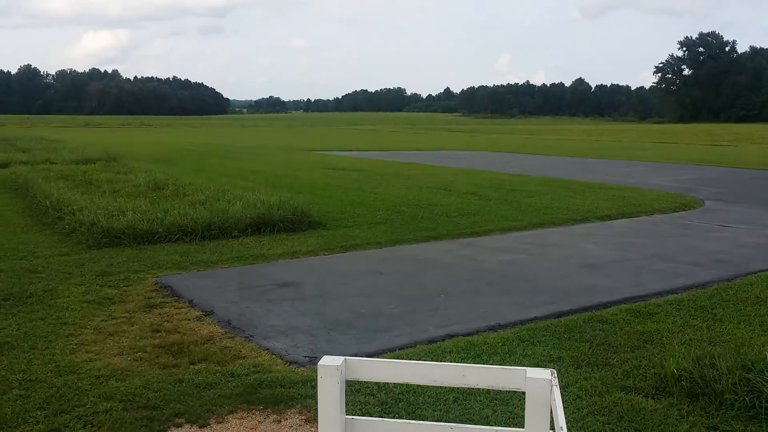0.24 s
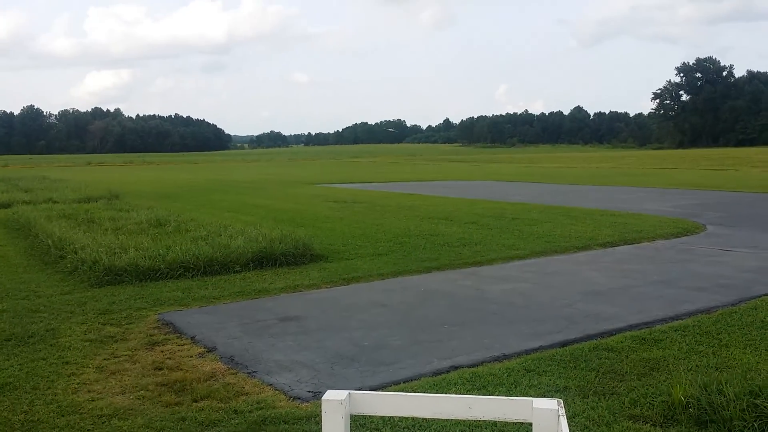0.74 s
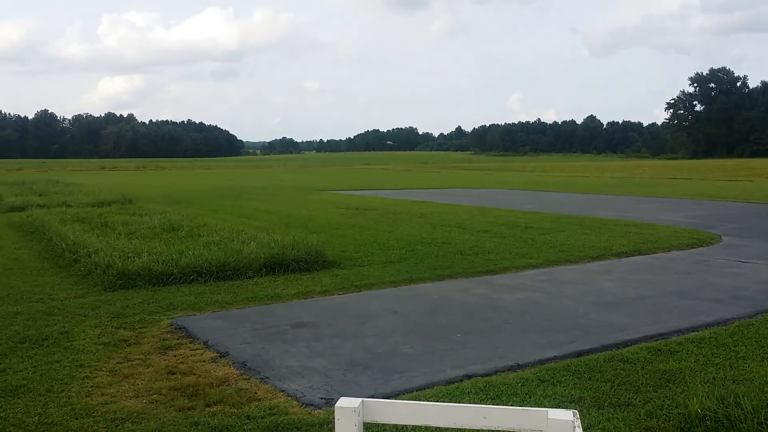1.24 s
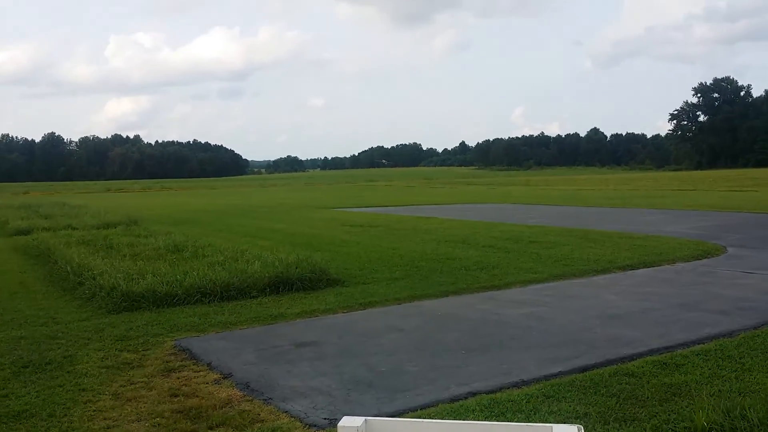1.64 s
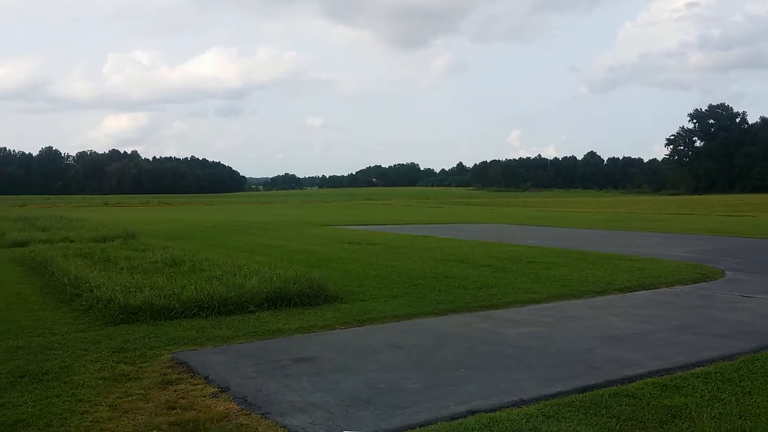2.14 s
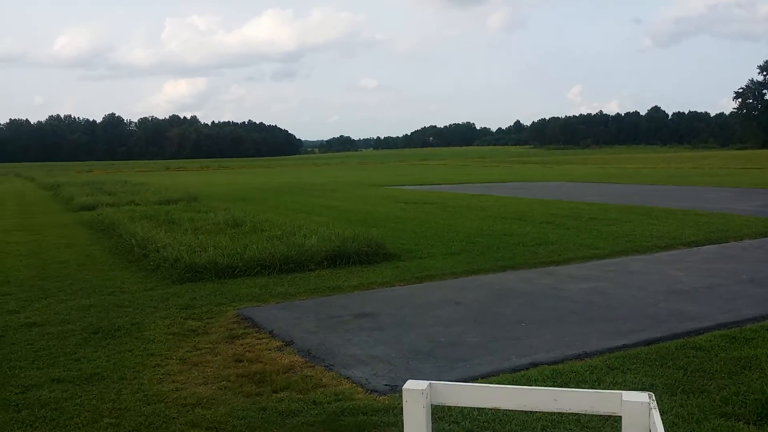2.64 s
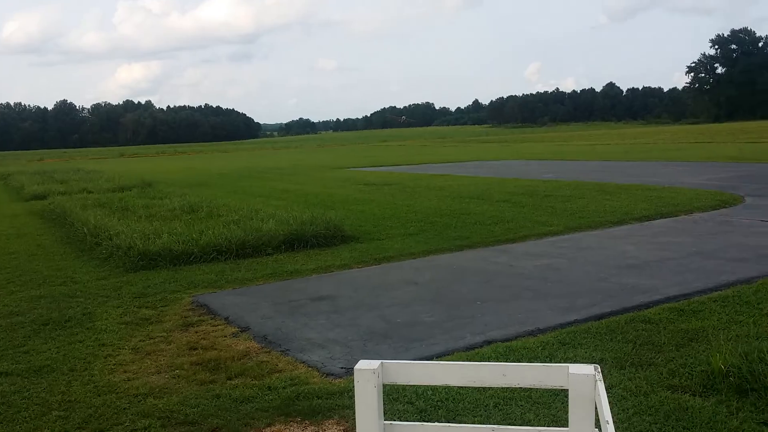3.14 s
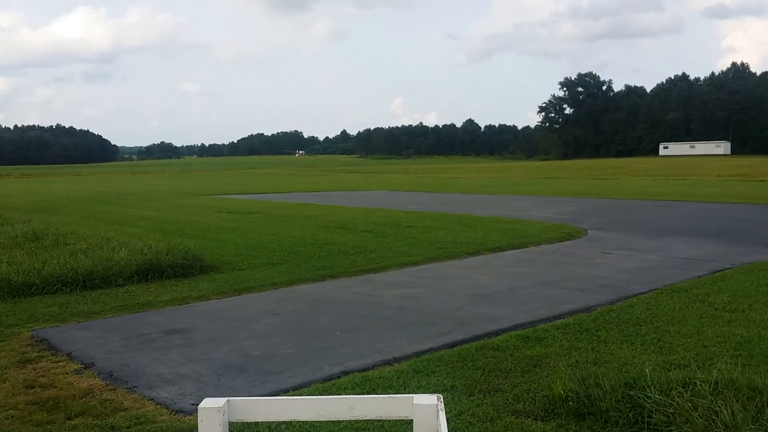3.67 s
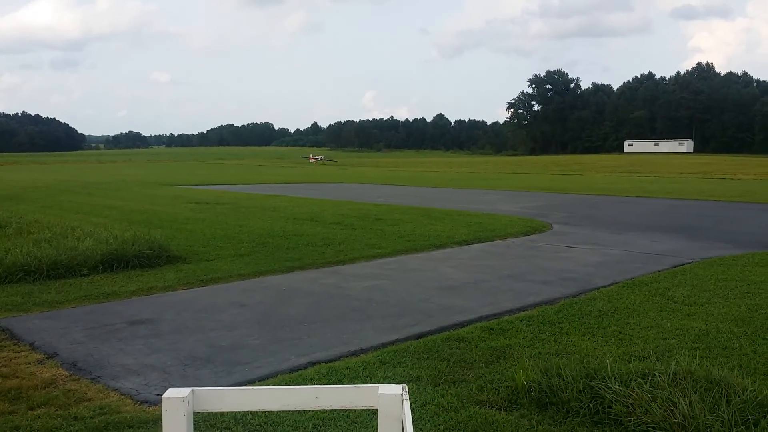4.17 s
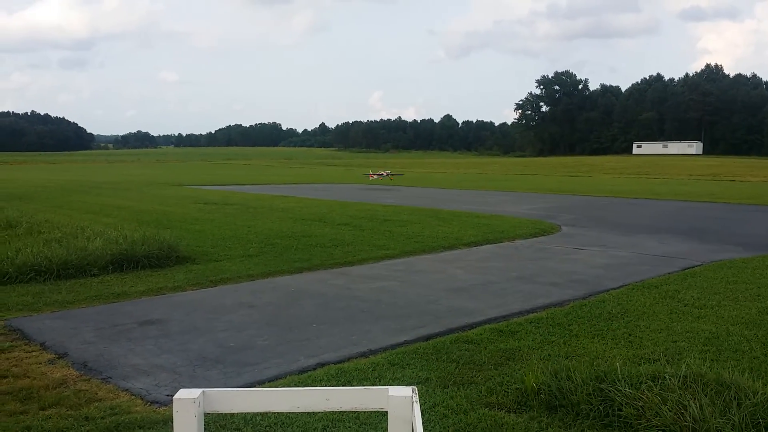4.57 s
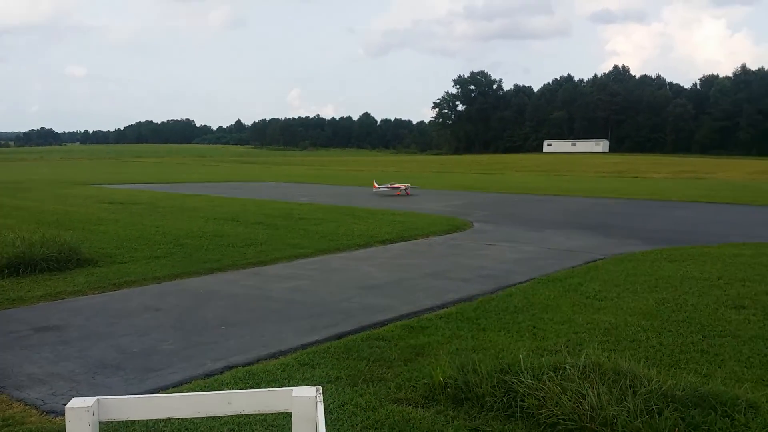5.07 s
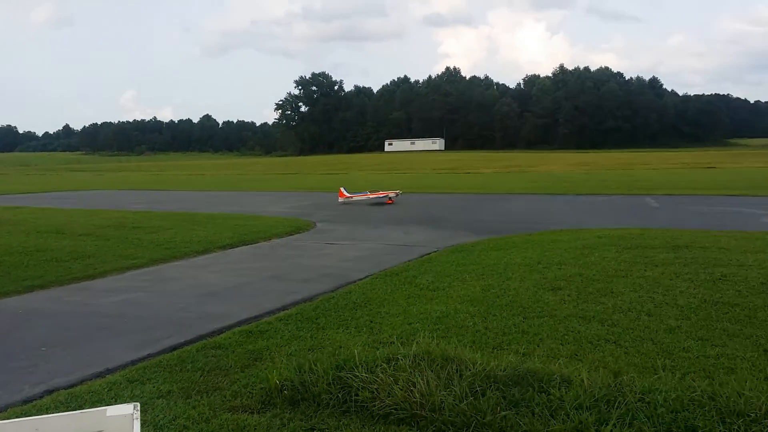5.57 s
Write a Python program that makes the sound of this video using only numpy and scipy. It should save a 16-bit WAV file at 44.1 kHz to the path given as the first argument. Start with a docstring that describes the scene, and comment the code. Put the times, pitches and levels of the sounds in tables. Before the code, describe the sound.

Outdoors among singing insects, a distant single-cylinder model aircraft engine blips its throttle, crackles closer, then slows as its wheels rumble along a runway.

```python
"""A small model plane glides in over a field with its single-cylinder engine near idle, blips the throttle
three times, lands and rolls past on the asphalt. Each firing is a filtered pulse (muffler thump, pipe putter)
with bursts of noise for rasp, propeller wash and crack; hard firings crack loudest.
Insects sing as a noise chorus and modulated sines over a faint rumble and hum. A short scuff (noise) and
dull thud (decaying sines) bump the microphone once; noise and ringing modes make the wheels."""
import sys
import numpy as np
from scipy import signal
from scipy.fft import rfft, irfft, next_fast_len
from scipy.io import wavfile

SR = 44100
rng = np.random.default_rng(int(sys.argv[2]) if len(sys.argv) > 2 else 0)


def master_out(mix):
    """Clip the mix to full scale and print it as 16-bit PCM to the path in sys.argv[1]."""
    frames = np.transpose(np.atleast_2d(mix))
    ceiling = np.clip(frames, -1, 1)
    pcm = np.round(ceiling * 32767).astype(np.int16)
    wavfile.write(sys.argv[1], SR, pcm)


N = 256220
T = np.arange(N) / SR


def amp(db):
    """Decibels to gain."""
    return 10 ** (np.asarray(db) / 20)


def unit(x):
    """Scales to rms 1."""
    return x / np.sqrt(np.mean(x ** 2) + 1e-20)


def read(points, hz):
    """Reads a spectrum on a log-frequency axis."""
    f, value = np.transpose(points)
    return np.interp(np.log(hz + 1), np.log(f + 1), value)


def follow(rows, t, outside=None):
    """Reads a curve at the times t."""
    s, value = np.transpose(rows)
    return np.interp(t, s, value, left=outside, right=outside)


def add(mix, start_s, sound):
    """Mixes a sound in at start_s."""
    part = mix[..., max(round(start_s * SR), 0):][..., :sound.shape[-1]]
    part += sound[..., :part.shape[-1]]


def filtered(x, kind, order, hz):
    """Butterworth filter."""
    return signal.sosfilt(signal.butter(order, hz, kind, fs=SR, output="sos"), x)


# plane's level at the left port against the right: freq_hz, left_minus_right_db
PORT_LEVEL = [(100, -3), (400, -4), (750, -3), (1300, 3.5), (2400, 5), (4400, 7), (6700, 7.5), (8200, -4.5),
              (14000, -2)]
# plane's phase between the ports: freq_hz, left_lead_rad
PORT_LEAD = [(0, 1), (700, -0.5), (1210, 1.5), (2240, -0.1), (5000, -0.2), (6700, 0.8), (7400, -4.5),
             (8600, -1.5), (16000, -3)]


def colour(x, tone, side=0.):
    """Stereo minimum-phase filter of unit energy; side scales the plane's level and phase between the ports."""
    size, lead = 8192, 32  # samples
    hz = np.fft.rfftfreq(size, 1 / SR)
    ports = side * np.array([[.5], [-.5]])
    db = read(tone, hz) + ports * read(PORT_LEVEL, hz)
    log_gain = np.log(amp(np.concatenate([db, db[:, -2:0:-1]], axis=1)))
    causal = np.exp(np.conj(signal.hilbert(log_gain)))[:, :len(hz)]
    shifted = causal * np.exp(1j * ports * read(PORT_LEAD, hz))
    taps = np.roll(irfft(shifted), lead, axis=1)[:, :size // 2]
    taps /= np.linalg.norm(taps.mean(axis=0))
    return signal.oaconvolve(np.broadcast_to(x, (2, N)), taps, axes=1)[:, lead:N + lead]


# likeness of turbulence at the two ports: freq_hz, correlation
PORT_CORRELATION = [(100, 0.97), (600, 0.93), (1500, 0.99), (3200, 0.66), (6800, 0.35), (12000, 1)]


def air():
    """White noise at both ports, correlated by frequency."""
    size = next_fast_len(N)
    a, b = rfft(rng.standard_normal((2, size)))
    same = np.clip(read(PORT_CORRELATION, np.fft.rfftfreq(size, 1 / SR)), -1, 1)
    return irfft(np.array([a, same * a + np.sqrt(1 - same ** 2) * b]), size)[:, :N]


def drift(per_s):
    """Slow random wander of rms 1."""
    spectrum = rfft(rng.standard_normal(N))
    return unit(irfft(spectrum * np.exp(-(np.fft.rfftfreq(N, 1 / SR) / per_s) ** 2), N))


def clicks(times, sizes):
    """A train of single impulses."""
    return np.bincount(np.clip(np.round(times * SR).astype(int), 0, N + 1), sizes, N + 2)[:N]


def puffs(train, decay_s):
    """Each impulse releases a decaying burst of turbulence; its energy does not depend on decay_s."""
    keep = np.exp(-2 / (decay_s * SR))
    return air() * np.sqrt(signal.lfilter([1 - keep], [1, -keep], train ** 2 + 1e-24))


def fizz(train, decay_s):
    """Fine turbulence: puffs without their bass, so the pulse below them stays clean."""
    return filtered(puffs(train, decay_s), "high", 2, 1500)


def rounded(train):
    """A pressure front loses its sharpest edge on its way over the grass."""
    return filtered(train, "low", 1, 3800)


def envelope(start_s, level_db, attack_s, fade_db_per_s):
    """A sound rises to its level, then fades."""
    t = T - start_s
    return np.clip(t / attack_s, 0, 1) * amp(level_db - fade_db_per_s * np.maximum(t - attack_s, 0))


# crankshaft speed: time_s, firings_per_s
CRANK_SPEED = [(0.0, 34.68), (0.175, 31.87), (0.629, 30.36), (0.883, 32.58), (1.185, 28.95), (1.538, 46.39),
               (1.781, 49.66), (2.086, 46.88), (2.334, 38.3), (2.612, 33.06), (3.211, 29.11), (3.56, 30.85),
               (3.812, 35.94), (4.226, 48.18), (4.576, 39.12), (4.82, 47.57), (5.315, 28.05),
               (5.451, 28.38), (5.706, 22.64), (5.81, 23.84)]
FULL_PULL = 37  # firings/s gained each second


def pick_up(times, over_s=0.19, lag_s=0.013):
    """How fast the engine gains or loses speed, in firings/s each second, limited to full pull."""
    late = times - lag_s
    gained = follow(CRANK_SPEED, late + over_s / 2) - follow(CRANK_SPEED, late - over_s / 2)
    return np.clip(gained / over_s, -FULL_PULL, FULL_PULL)


# plane's distance: time_s, distance_m
PLANE_DISTANCE = [(0, 111), (1.2, 90), (2.1, 77.2), (3.1, 53), (3.75, 42.5), (4.25, 30.9), (4.8, 27.3),
                  (5.35, 20.8), (5.81, 21.9)]
# plane's approach: time_s, nearness (0 far and head-on, 1 near and side-on)
NEARNESS = [(2.2, 0.083), (3.6, 0.38), (4.2, 0.53), (4.7, 0.84)]
IDLE_PER_S, REFERENCE_M = 30, 50


def loudness(law, times):
    """An engine sound grows as the plane nears, as the engine runs faster and as it pulls: dB."""
    idle_db, distance_db, head_on_db, side_on_db, pull_db = law
    speed_db = head_on_db + (side_on_db - head_on_db) * follow(NEARNESS, times)
    doublings_away = np.log2(follow(PLANE_DISTANCE, times) / REFERENCE_M)
    doublings_fast = np.log2(follow(CRANK_SPEED, times) / IDLE_PER_S)
    return idle_db - distance_db * doublings_away + speed_db * doublings_fast + pull_db * pick_up(times)


def turning(x, far_tone, near_tone):
    """The exhaust changes colour as the plane comes near and turns its side."""
    near = np.clip(follow(NEARNESS, T), 0, 1)
    return colour(x * (1 - near), far_tone, side=0.95) + colour(x * near, near_tone, side=0.73)


# loud pops that stand out of the crackle: time_s, body_db, bite_db, treble_db
LOUD_POPS = [(0.076, -63, -64.5, -70), (0.39, -55, -63, -79), (0.485, -66, -59.5, -77),
             (0.782, -57.5, -65, -70), (1.163, -59, -64, -76), (1.197, -63, -59, -72),
             (1.261, -53, -53.5, -60), (1.292, -66, -55, -67), (1.32, -71, -54, -65),
             (1.3485, -55, -48.5, -68), (1.375, -49, -52.5, -62), (1.4, -48.5, -53, -62),
             (1.4485, -45.5, -52, -73), (1.4948, -51, -68, -72), (1.517, -45.5, -53, -60),
             (1.5605, -49, -56, -71), (1.5823, -46, -53, -68), (1.6044, -47, -55, -64),
             (1.645, -41, -50, -47), (1.686, -48.5, -48.5, -57), (1.7265, -46, -54.5, -54),
             (1.767, -47.5, -50, -61), (1.8485, -44.5, -53, -64), (1.889, -51, -59, -58),
             (1.9304, -50, -54, -57), (1.972, -47.5, -52.5, -63), (2.0564, -54, -59, -68),
             (2.529, -57, -53.5, -63), (2.741, -48.5, -65, -66), (2.803, -48.5, -66, -53),
             (2.898, -47, -52.5, -58), (2.961, -50, -55, -81), (3.06, -52, -58, -76),
             (3.332, -42.5, -49, -47), (3.499, -59, -54.5, -51), (3.568, -42, -58, -39),
             (3.688, -45, -45.5, -46), (3.718, -46, -53, -42), (3.776, -41, -43.5, -36),
             (3.832, -41.5, -50, -41), (3.883, -43.5, -52, -32), (3.936, -41.5, -50, -40),
             (3.961, -43.5, -43, -34), (4.01, -39, -50, -34), (4.057, -38, -47.5, -39),
             (4.08, -39, -48, -38), (4.103, -36, -42.5, -48), (4.147, -37, -43, -40),
             (4.168, -37, -46, -31.5), (4.209, -37.5, -39.5, -44), (4.2321, -38.5, -49, -31.5),
             (4.477, -40.5, -49, -42), (4.55, -40, -44, -35), (4.576, -40.5, -42.5, -37.5),
             (4.6005, -38, -46, -31.5), (4.626, -39, -35, -33.5), (4.65, -37.5, -38, -36),
             (4.675, -39, -33.5, -38), (4.7203, -36, -35.5, -32), (4.741, -37, -44, -33),
             (4.765, -36.5, -31.5, -29.5), (4.785, -46, -38, -50), (4.8082, -34, -32.5, -30),
             (4.85, -40, -36.5, -47), (5.377, -45, -33.5, -33.5), (5.412, -62, -45, -38.5),
             (5.482, -51, -39, -41), (5.723, -35, -49, -35.5)]
START_TURN = .393  # turns
PULL_HARDENS = 0.071  # hardness of the turns between at full pull, 0-1


def firings(front_s=0.00055):
    """One firing a turn: times, indices of the loud pops, hardness (0-1).

    After a pop every second turn fires hard; pulling hardens the turns between, running down weakens the hard ones."""
    turns = START_TURN + np.cumsum(follow(CRANK_SPEED, T)) / SR
    times = T[1:][np.diff(np.floor(turns)) > 0]
    pop_times = np.array(LOUD_POPS)[:, 0] + front_s
    pops = abs(times[:, None] - pop_times).argmin(axis=0)
    slip_s = pop_times - times[pops]
    times[pops] += np.where(abs(slip_s) > .001, slip_s, 0)
    turn = np.arange(len(times))
    since_pop = turn - np.maximum.accumulate(turn * np.isin(turn, pops))
    pull = pick_up(times) / FULL_PULL
    between = np.clip(PULL_HARDENS, 0, 1) * np.maximum(pull, 0) ** 2
    return times, pops, np.where(since_pop % 2, between, 1 + np.minimum(pull, 0))


def smear(x, below_hz):
    """The muffler's chambers hold the bass back a little (all-pass), which rounds each pulse."""
    keep = np.exp(-2 * np.pi * below_hz / SR)
    return signal.lfilter([-keep, 1], [1, -keep], x)


# thump loudness law: idle_db (at REFERENCE_M), loss_db_per_distance_doubling,
# head_on_db_per_speed_doubling, side_on_db_per_speed_doubling, db_per_pick_up (firings/s each second)
THUMP_LAW = (-52.5, 14.5, 7.5, 6.5, 0.0522)
# booming turns as the engine slows on the runway: time_s, added_db
BOOMING_TURNS = [(5.275, 0), (5.343, 1), (5.413, 1.5), (5.449, 0.5), (5.52, 2.5), (5.68, 3.5), (5.768, 3.5)]
# thump spectrum, far: freq_hz, rel_db
THUMP_FAR_TONE = [(30, -57), (65, -28), (95, -2), (140, 3), (175, 1), (225, -3.5), (280, -10.5), (345, -10),
                  (470, -17.5), (640, -12), (1100, -27), (2500, -58), (8000, -107)]
# thump spectrum, near: freq_hz, rel_db
THUMP_NEAR_TONE = [(30, -31), (65, -10.5), (100, -10.5), (140, -5), (190, 6.5), (240, -3.5), (285, -2.5),
                   (350, -3), (480, -7), (620, -24), (800, -14), (1150, -31), (2500, -63), (8000, -102.5)]


def thumps(times, hard, share, hard_db=2.0, echo_s=0.0147, echo_db=-17.5, lag_s=0.00058):
    """Each pressure pulse booms in the muffler; one echo and some scatter come back from the field."""
    db = loudness(THUMP_LAW, times) + .8 * rng.standard_normal(len(times))
    for s, boom_db in BOOMING_TURNS:
        db[abs(times - s).argmin()] += boom_db
    sizes = share * amp(db + hard_db * hard)
    train = clicks(times + lag_s, sizes)
    scatter = amp(-15) * puffs(train, decay_s=.07)
    echo = clicks(times + echo_s, sizes * amp(echo_db))
    pulse = smear(train + echo, below_hz=253.0)
    return turning(scatter - pulse, THUMP_FAR_TONE, THUMP_NEAR_TONE)


# putter loudness law: columns as THUMP_LAW
PUTTER_LAW = (-59.5, 7.5, 1.5, 6, 0.1343)
# putter spectrum, far: freq_hz, rel_db
PUTTER_FAR_TONE = [(150, -24), (330, -13), (470, 3), (660, -1), (880, -3.5), (1130, -15), (2500, -34)]
# putter spectrum, near: freq_hz, rel_db
PUTTER_NEAR_TONE = [(120, -28), (300, -2), (440, -1), (540, -7.5), (650, -13.5), (850, -8), (1150, -25),
                    (2500, -48.5)]


def putter(times, share, lag_s=0.00057):
    """The exhaust pipe gives a short hollow note at each firing, uneven at idle and steadier at speed."""
    uneven_db = 1.4 * (IDLE_PER_S / follow(CRANK_SPEED, times)) ** 2
    db = loudness(PUTTER_LAW, times) + uneven_db * rng.standard_normal(len(times))
    return turning(-clicks(times + lag_s, share * amp(db)), PUTTER_FAR_TONE, PUTTER_NEAR_TONE)


# muffler's metal modes: freq_hz, head_on_rel_db, side_on_rel_db, t60_s
MUFFLER_MODES = [(870, -2.5, 17, 0.0063), (1380, 1.5, -32, 0.048), (1850, 6, -7, 0.045),
                 (2267, 9, 11, 0.029), (4077, -2, 17, 0.035), (6850, 7, 3, 0.011)]


def ring(x, uneven_db=3.5):
    """The muffler's metal modes ring; their mix shifts as the plane turns its side and wanders at random."""
    t, side_on = T[:SR // 10], np.clip(follow(NEARNESS, T), 0, 1) ** 2
    modes = np.array([amp(-60 * t / t60_s) * np.cos(2 * np.pi * hz * t) for hz, _, _, t60_s in MUFFLER_MODES])
    modes /= np.linalg.norm(modes * amp(np.array(MUFFLER_MODES)[:, 1:2]))
    ringing = 0
    for mode, (_, head_db, side_db, _) in zip(modes, MUFFLER_MODES):
        mode_db = head_db + (side_db - head_db) * side_on + uneven_db * drift(8.5)
        ringing = ringing + signal.oaconvolve(x * amp(mode_db), mode[None], axes=1)[:, :N]
    return ringing


# rasp loudness law: columns as THUMP_LAW; level_db is added
RASP_LAW = (-58, 10, 19, 3.5, 0.0254)
# rasp spectrum: freq_hz, rel_db
RASP_SPECTRUM = [(150, -53), (400, 9), (650, 12), (850, 11), (1170, 1.5), (1450, 8.5), (1820, 8),
                 (2080, -23), (2330, 2), (2750, -11), (4700, -21), (7000, -17), (10000, -6), (16000, -10)]


def rasp(times, share, level_db=-10.5, uneven_db=1.5, ring_db=-9.5):
    """The sharp edge of each pulse, alike from turn to turn, with a puff of escaping gas behind it."""
    db = loudness(RASP_LAW, times) + uneven_db * rng.standard_normal(len(times))
    train = clicks(times, share * amp(db + level_db))
    gas = amp(-6) * fizz(train, decay_s=.007) - rounded(train)
    return colour(gas + amp(ring_db) * ring(gas), RASP_SPECTRUM, side=0.31)


# propeller wash loudness law: columns as THUMP_LAW
WASH_LAW = (-60.5, 8.5, 8.5, 10.5, 0.0281)
# loudness law of the roar thrown ahead: columns as THUMP_LAW
ROAR_LAW = (-64, 16, 27.5, 8, 0.0338)
# wash spectrum: freq_hz, rel_db
WASH_SPECTRUM = [(300, -13), (900, 6), (1700, 0.5), (2500, 2), (3400, 1), (4700, 0.5), (5800, -4.5),
                 (7200, 3.5), (8500, -2), (10500, -15), (16000, -15)]
# roar spectrum: freq_hz, rel_db
ROAR_SPECTRUM = [(250, -27), (500, 4), (1000, -3.5), (1500, 3.5), (1850, 1.5), (2100, -2), (2300, -21),
                 (2700, -19), (3600, -37), (4100, -5), (4900, -3.5), (5800, -12), (10000, -27)]


def wash(times, share):
    """Propeller turbulence surges with each power stroke; seen head-on at speed it roars."""
    train = clicks(times, share * amp(loudness(WASH_LAW, times)))
    head_on = (1 - follow(NEARNESS, times)) ** 2
    ahead = clicks(times, share * amp(loudness(ROAR_LAW, times)) * head_on)
    surge = colour(puffs(train, decay_s=0.037), WASH_SPECTRUM, side=0.59)
    return surge + colour(puffs(ahead, decay_s=0.071), ROAR_SPECTRUM, side=0.5)


# crackle loudness law of hard firings: columns as THUMP_LAW
CRACKLE_LAW = (-56.5, 14, 22.5, 22.5, 0.1579)
WEAK_TURN_DB = -10.5  # against a hard turn
# make-up of an ordinary crack: body_db, bite_db, treble_db
HEAD_ON_DB, SIDE_ON_DB = (-1.5, -20.5, 1.5), (-22, -2.5, -4)


def crack_levels(times, pops, hard, colour_db=5.0):
    """Body, bite and treble of every firing's crack, in dB; no two are quite alike."""
    chance = rng.standard_normal((len(times), 4))
    db = loudness(CRACKLE_LAW, times) + WEAK_TURN_DB * (1 - hard) + 1.4 * chance[:, 0]
    near = follow(NEARNESS, times)[:, None]
    make_up_db = (1 - near) * HEAD_ON_DB + near * SIDE_ON_DB
    bands_db = db[:, None] + make_up_db + colour_db * chance[:, 1:]
    bands_db[pops] = np.array(LOUD_POPS)[:, 1:]
    return bands_db


# gas resonance in the muffler: time_s, pitch_hz, rel_db (against the crack)
GAS_PING = [(0.1, 3006, -4.5), (1.3, 3095, -13), (2.0, 3060, -31), (2.501, 3056, -5.5), (3.353, 3018, 0),
            (3.8, 3262, -6), (4.3, 3190, -7), (4.8, 3280, -20), (5.4, 2920, -11)]


def ping(train, t60_s=0.036):
    """Each crack rings the gas in the muffler at a pitch that moves with its heat."""
    rows, keep = np.array(GAS_PING), amp(-60 / (t60_s * SR))
    dying = signal.lfilter([np.sqrt(2 * (1 - keep ** 2))], [1, -keep], train + 1e-18)
    phase = 2 * np.pi * np.cumsum(follow(rows[:, :2], T)) / SR
    return dying * amp(follow(rows[:, ::2], T)) * np.sin(phase)


# crack spectrum, far: freq_hz, rel_db
CRACK_FAR_TONE = [(200, -14.5), (520, 10), (1100, 3.5), (1800, -3.5), (2080, -11.5), (2300, -5.5),
                  (2750, -7.5), (3120, 2.5), (3600, -7.5), (4080, 2.5), (4400, 6), (4850, 11), (5300, 2.5),
                  (5750, 0.5), (6500, 2.5), (7100, 10.5), (9000, -2), (15000, -35.5)]
# crack spectrum, near: freq_hz, rel_db
CRACK_NEAR_TONE = [(200, 11.5), (600, 16), (1150, -5), (1750, 3), (2350, 1.5), (2750, 8.5), (3270, 7.5),
                   (3600, 12), (4050, 7), (5000, 5.5), (5500, -0.5), (6750, 6), (7600, -2.5), (10000, -5.5),
                   (15000, -10)]


def cracks(times, levels_db, front_db=-9.5, band_db=(-2., 0., -1.), tail_db=-17.0, ring_db=-14.5,
           bounce_s=.0042, bounce_db=-13.5):
    """A shock front and a short spit of gas set the metal ringing and scatter off the ground."""
    train = clicks(times, np.ones(len(times)))
    front = amp(front_db) * rounded(train)
    gas = fizz(train, decay_s=.0028)
    gas += amp(bounce_db) * fizz(clicks(times + bounce_s, np.ones(len(times))), decay_s=0.0022)
    spit = gas + amp(tail_db) * fizz(train, decay_s=0.043) - front
    sound = turning(spit + amp(ring_db) * ring(spit), CRACK_FAR_TONE, CRACK_NEAR_TONE)
    sound = sound + ping(train) * amp([[2.], [-2.5]])
    body, dull = (signal.sosfiltfilt(signal.butter(3, hz, fs=SR, output="sos"), sound) for hz in (2100, 5600))
    # band levels hold from just before each crack until the next
    latest = np.maximum(np.searchsorted(times - .002, T) - 1, 0)
    duty = len(times) * .008 * SR / N
    gains = amp(levels_db + band_db) * np.sqrt(duty)
    return sum(unit(band) * gain[latest] for band, gain in zip((body, dull - body, sound - dull), gains.T))


def engine():
    """Thump, putter, rasp, wash and cracks on one crankshaft."""
    times, pops, hard = firings()
    share = np.sqrt(SR / follow(CRANK_SPEED, times))  # a pulse carries the energy of a whole turn
    exhaust = thumps(times, hard, share) + putter(times, share) + rasp(times, share)
    return exhaust + wash(times, share) + cracks(times, crack_levels(times, pops, hard))


# faint low hum from far away: pitch_hz, level_db (both wander)
FAR_HUM = [(75.4, -70.5)]
# field spectrum: freq_hz, rel_db
FIELD_SPECTRUM = [(20, -30), (40, -17), (60, 0.5), (77, 3.5), (100, -1.5), (180, -10.5), (300, -11.5),
                  (700, -21), (1600, -22.5), (3000, -34), (5800, -42), (9600, -28), (11000, -34),
                  (16000, -37)]


def field(level_db=-58.5):
    """Distant rumble and the hush of open air as coloured noise, and a wavering sine hum."""
    hum = 0
    for hz, db in FAR_HUM:
        gain = np.sqrt(2) * amp(db + 2. * drift(2.3))
        hum = hum + gain * np.sin(2 * np.pi * np.cumsum(hz + 1.14 * drift(3.2)) / SR)
    return colour(air(), FIELD_SPECTRUM, side=0.61) * amp(level_db + drift(8.1)) + hum


# near bush cricket's six chirps: mid_s
NEAR_CHIRPS = [0.077, .28, .456, .639, .86, 1.084]
CHIRP_HZ, CHIRP_DB = 9590, -59.5
# farther bush cricket: leaves out some beats, slowly grows louder
ANSWER_FROM_S, ANSWER_EVERY_S, ANSWER_SHARE, ANSWER_HZ = 1.02, 0.19, 0.68, 10070
ANSWER_DB, ANSWER_RISE_DB_PER_S = -74, 3


def chirp_rows(loose_s=0.072):
    """Both bush crickets' chirps: mid_s, pitch_hz, level_db."""
    beats = ANSWER_FROM_S + ANSWER_EVERY_S * np.arange(20) + loose_s * rng.standard_normal(20)
    answers = beats[rng.random(len(beats)) < ANSWER_SHARE]
    rows = [(s, CHIRP_HZ, CHIRP_DB) for s in NEAR_CHIRPS]
    for s in answers:
        rows.append((s, ANSWER_HZ, ANSWER_DB + ANSWER_RISE_DB_PER_S * (s - ANSWER_FROM_S)))
    return rows


# chorus spectrum: freq_hz, rel_db
CHORUS_SPECTRUM = [(3000, -46), (6200, -69), (7000, 5.5), (7400, -0.5), (7800, 6.5), (8300, 1.5),
                   (8900, -18), (12000, -15)]
# swell of the cricket's trill: time_s, gain_db
TRILL_GAIN = [(.8, -11.5), (2.3, -2), (3.5, -1.5)]


def insects(chorus_db=-62.5, trill_db=-67.5, trill_top_hz=8420.0, trill_per_s=32.6, chirp_s=.06,
            strokes_per_s=114.0):
    """A far noise chorus, one cricket's trill of arched sine notes, and bush crickets' buzzy chirps."""
    chorus_gain = amp(chorus_db + 0.38 * drift(50.) + np.array([[-1.], [1.5]]))
    chorus = colour(rng.standard_normal((2, N)), CHORUS_SPECTRUM) * chorus_gain
    stroke = np.sin(np.pi * np.cumsum(trill_per_s + 0.15 * drift(3.4)) / SR) ** 2
    pitch_hz = trill_top_hz - 410.0 * (1 - stroke) + 26.5 * drift(135.0)
    trill = unit(stroke ** 2 * np.sin(2 * np.pi * np.cumsum(pitch_hz) / SR))
    trill = trill * amp(trill_db + np.array([[-2.], [2.5]])) * amp(follow(TRILL_GAIN, T))
    chirps, t = np.zeros(N), T[:int(chirp_s * SR)]
    wings = signal.windows.tukey(len(t), .7) * (1 + 0.79 * np.sin(2 * np.pi * strokes_per_s * t))
    for mid_s, hz, db in chirp_rows():
        teeth = np.cumsum(hz + 570.0 * rng.standard_normal(len(t))) / SR  # uneven file teeth blur the pitch
        add(chirps, mid_s - chirp_s / 2, amp(db) * unit(wings * np.sin(2 * np.pi * teeth)))
    return chorus + trill + chirps * amp([[-10.], [0.]])


def note(hz, db, t60_s, rise_s):
    """One struck mode: a decaying sine with a soft onset."""
    t = T[:SR // 3]
    return amp(db - 60 * t / t60_s) * (1 - np.exp(-t / rise_s)) * np.sin(2 * np.pi * hz * t)


# dull knocks within the bump: start_s, pitch_hz, level_db, t60_s
DULL_KNOCKS = [(3.165, 276, -28.5, 0.11), (3.172, 140, -27.5, 0.15), (3.175, 243, -38, 0.15),
               (3.198, 91, -28.5, 0.17), (3.207, 61, -35, 0.22), (3.219, 125, -36, 0.22),
               (3.235, 198, -31, 0.082)]
# scuffs of the rustle: start_s, level_db, casing_ring_db
RUSTLE_SCUFFS = [(3.148, -48, -35), (3.163, -41, -43), (3.178, -49.5, -38), (3.2, -47, -41)]
# bump rumble spectrum: freq_hz, rel_db
BUMP_SPECTRUM = [(20, -33), (55, 2), (110, 1), (210, 3.5), (310, -4), (420, -13.5), (700, -21.5),
                 (1500, -20), (4000, -53)]
# rustle spectrum: freq_hz, rel_db
RUSTLE_SPECTRUM = [(500, -53), (1400, -16), (1800, 8.5), (2050, 2), (2240, 11), (2450, -6), (2700, 5),
                   (3100, -8), (4800, -4), (8000, -5), (16000, -26)]
BUMP_S, BUMP_DB, BUMP_ATTACK_S, BUMP_FADE_DB_PER_S = 3.148, -36, 0.01, 73
CASE_HZ, CASE_T60_S = 2250, 0.028


def bump():
    """Scuffs that make the casing ring, a few dull knocks and a rumble right at the microphone."""
    rumble_gain = envelope(BUMP_S, BUMP_DB, BUMP_ATTACK_S, BUMP_FADE_DB_PER_S)
    knocks = colour(air(), BUMP_SPECTRUM, side=1) * rumble_gain
    for s, hz, db, t60_s in DULL_KNOCKS:
        add(knocks, s, note(hz, db, t60_s, rise_s=0.0064))
    for s, _, ring_db in RUSTLE_SCUFFS:
        add(knocks, s, note(CASE_HZ, ring_db, CASE_T60_S, rise_s=0.00095))
    scuffs = sum(envelope(s, db, attack_s=0.0012, fade_db_per_s=623.0) for s, db, _ in RUSTLE_SCUFFS)
    return knocks + colour(air() * amp(2. * drift(250.)), RUSTLE_SPECTRUM, side=0.56) * scuffs


# wheels skip on the asphalt: start_s, rel_db
WHEEL_SKIPS = [(5.073, -39), (5.178, -46.5), (5.273, -46.5)]
# then stay down and roll: time_s, drum_rel_db, scrub_rel_db
WHEEL_ROLL = [(5.375, -51.5, -58), (5.49, -40, -41), (5.559, -40, -46.5), (5.68, -32.5, -40.5),
              (5.745, -38.5, -37.5), (5.81, -38.5, -40)]


def contact(attack_s=0.0093, fade_db_per_s=109.0):
    """How hard the wheels drum and scrub: a few skips, then the roll."""
    skips = sum(envelope(s, db, attack_s, fade_db_per_s) for s, db in WHEEL_SKIPS)
    roll = np.array(WHEEL_ROLL)
    drumming = skips + amp(follow(roll[:, :2], T, -120))
    return drumming, skips + amp(follow(roll[:, ::2], T, -120))


# hollow airframe modes: freq_hz, width_hz, rel_db
AIRFRAME_MODES = [(551, 74, 1), (684, 87, -7), (966, 59, -8), (1350, 30, -9), (2440, 32, -14),
                  (2880, 73, -21)]
# drumming spectrum: freq_hz, rel_db
DRUM_SPECTRUM = [(100, -38), (240, 6), (480, -3.5), (640, -0.5), (960, 0.5), (1220, -8), (1500, -7),
                 (2200, -15), (3000, -15), (5000, -35.5)]
# tyre scrub spectrum: freq_hz, rel_db
SCRUB_SPECTRUM = [(400, -3), (1500, -2.5), (2450, 6.5), (3400, 0.5), (4700, 0.5), (6800, -3.5), (9000, -6),
                  (12000, -15), (16000, -28)]
# landing gear knocks: start_s, rel_db
GEAR_KNOCKS = [(5.0757, -21.5), (5.092, -52), (5.436, -20.5), (5.7134, -32)]


def wheels(drum_db=1.0, modes_db=-2.5, scrub_db=-2.0, grit_db=3.0, knock_db=9.0):
    """Tyres scrub over grit and drum the hollow airframe; the landing gear knocks as noise bursts."""
    (drumming, scrubbing), t = contact(), T[:SR // 8]
    jolts = unit(amp(1.5 * drift(60.)))
    road = air() * jolts
    modes = 0
    for hz, width_hz, db in AIRFRAME_MODES:
        decay = np.exp(-np.pi * width_hz * t)
        modes = modes + amp(db) * np.sqrt(width_hz) * decay * np.sin(2 * np.pi * hz * t)
    hollow = signal.oaconvolve(air() * jolts, modes[None] / np.linalg.norm(modes), axes=1)[:, :N]
    drum = (amp(drum_db) * colour(road, DRUM_SPECTRUM, side=0.42) + amp(modes_db) * hollow) * drumming
    grit = unit(air() * amp(grit_db * drift(170.0)))
    scrub = colour(grit, SCRUB_SPECTRUM, side=0.97) * amp(scrub_db) * scrubbing
    s, db = np.transpose(GEAR_KNOCKS)
    knocks = puffs(clicks(s, amp(db + knock_db)), decay_s=0.0024)
    return drum + scrub + colour(knocks, CRACK_NEAR_TONE, side=1)


def scene():
    """The plane and the field around it."""
    return engine() + wheels() + bump() + insects() + field()


def record(dry, low_cut_hz=59.0, edge_hz=15700):
    """The microphone's low cut and the recorder's band limit."""
    thin = filtered(dry, "high", 2, low_cut_hz)
    band_limit = signal.firwin(255, edge_hz, window=("kaiser", 9), fs=SR)
    return signal.oaconvolve(thin, band_limit[None], "same")


dry = scene()
out = record(dry)
master_out(out)
```